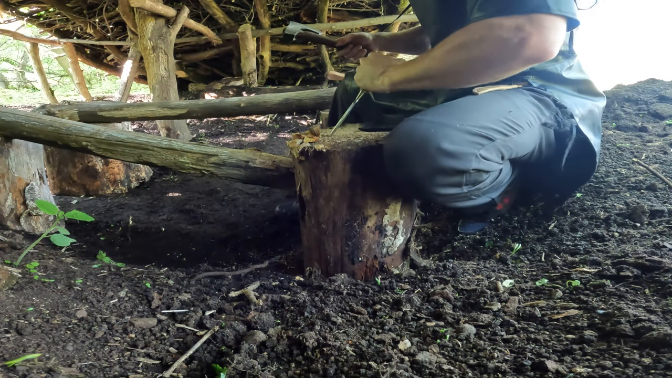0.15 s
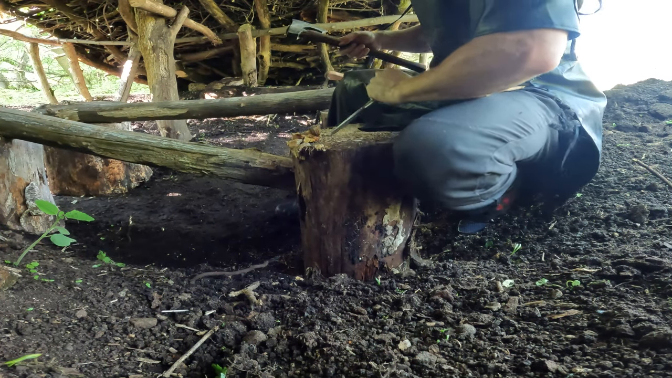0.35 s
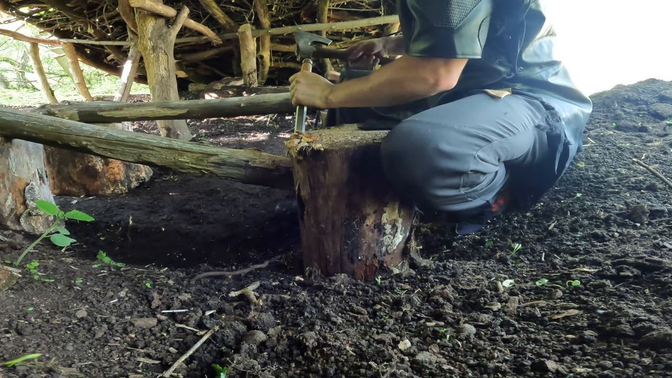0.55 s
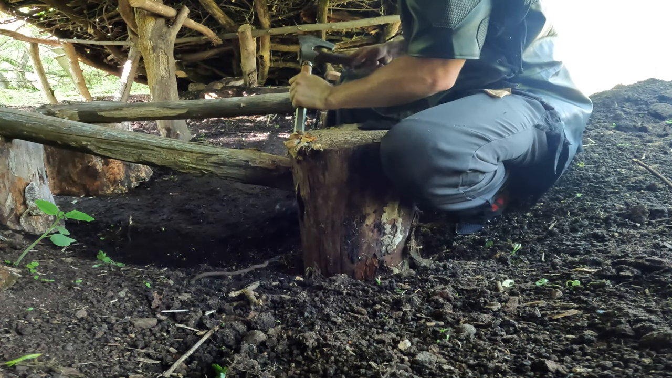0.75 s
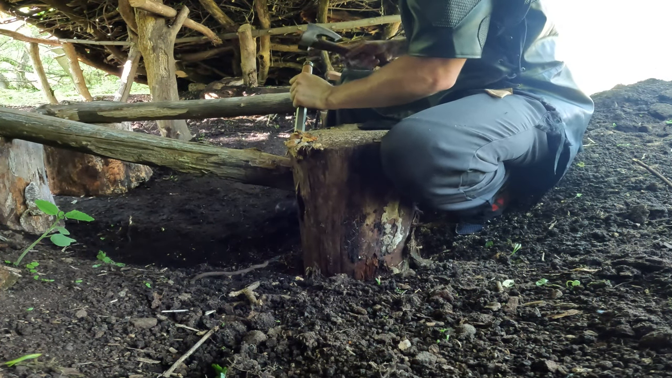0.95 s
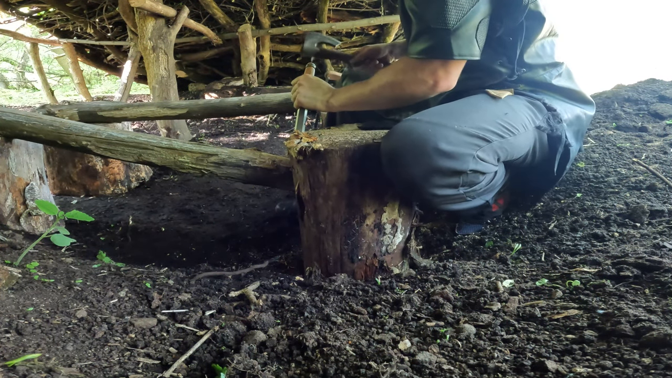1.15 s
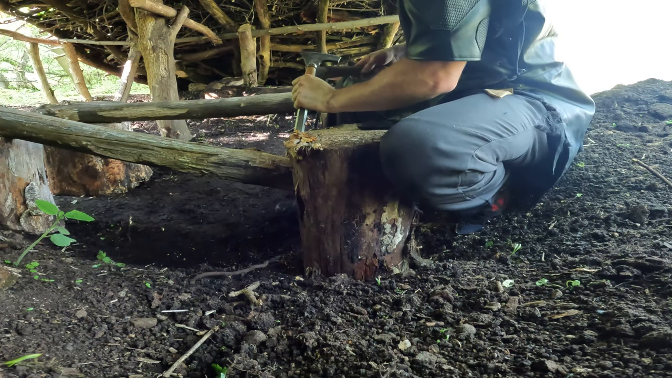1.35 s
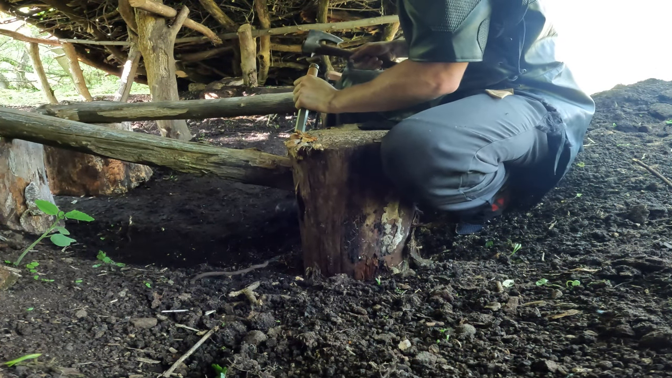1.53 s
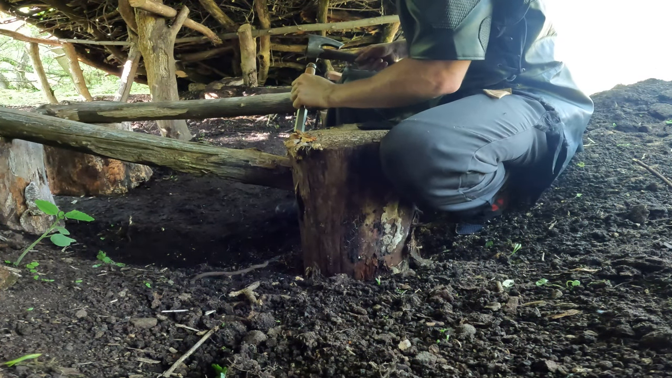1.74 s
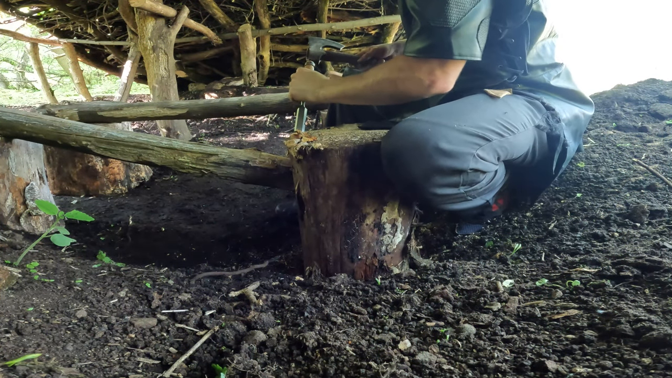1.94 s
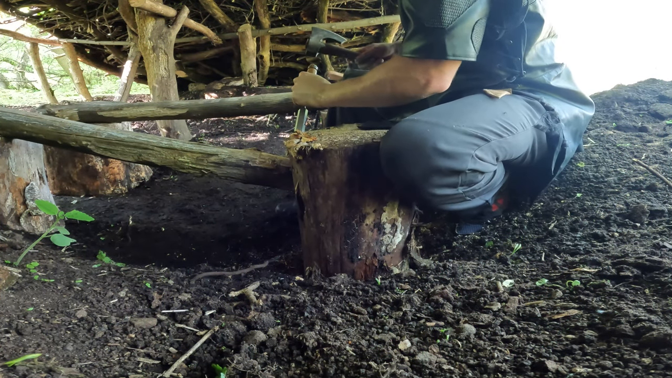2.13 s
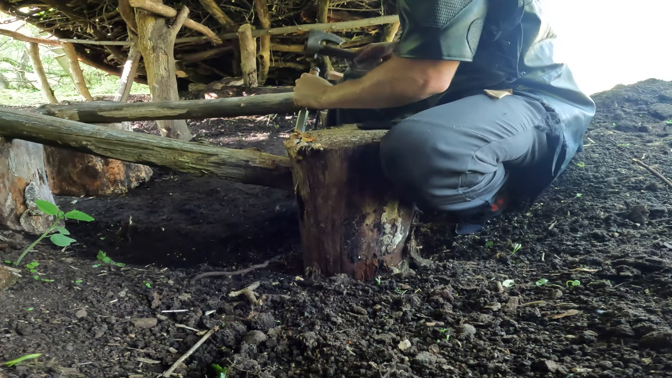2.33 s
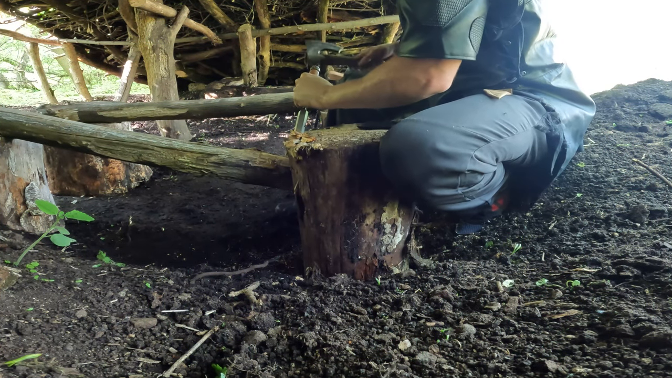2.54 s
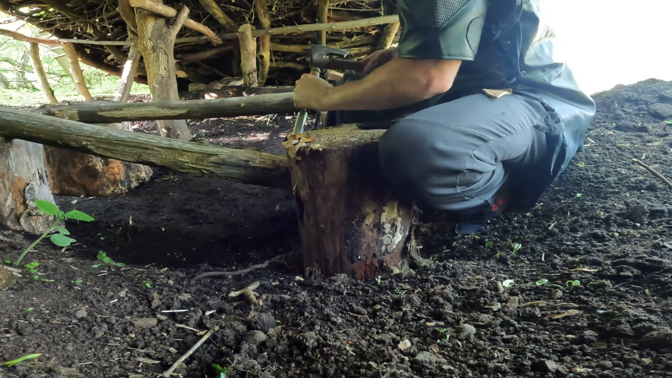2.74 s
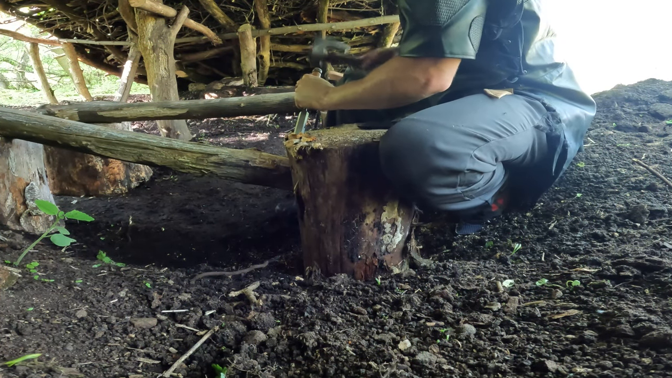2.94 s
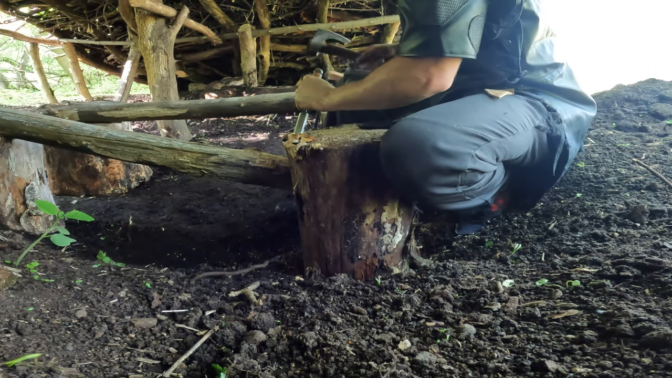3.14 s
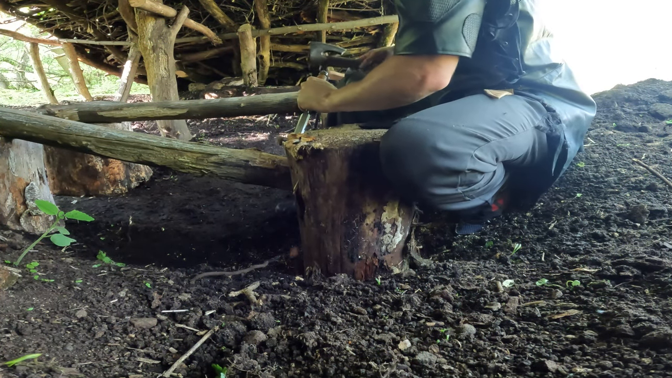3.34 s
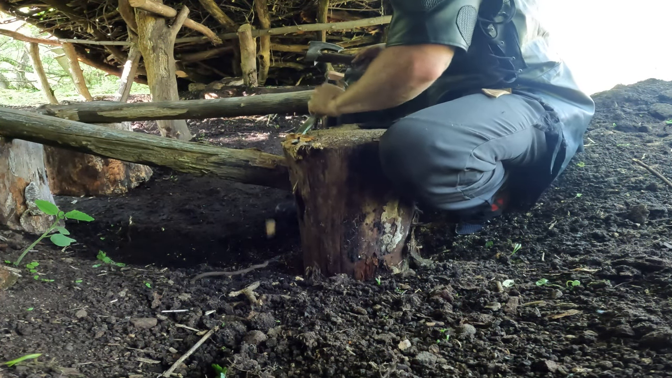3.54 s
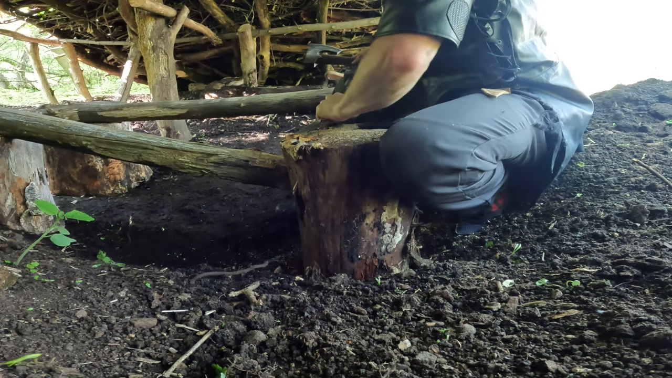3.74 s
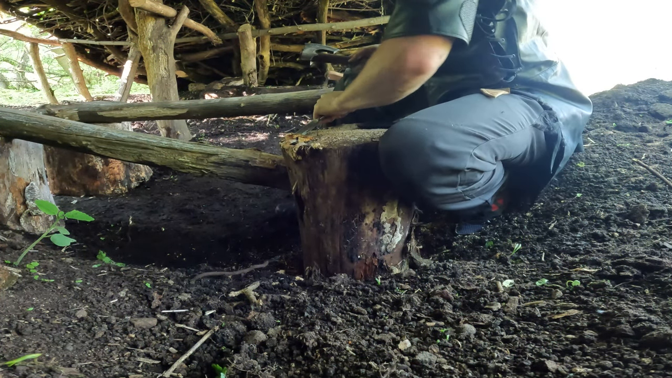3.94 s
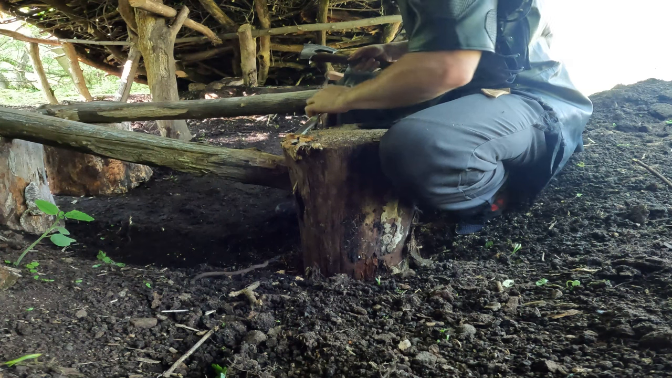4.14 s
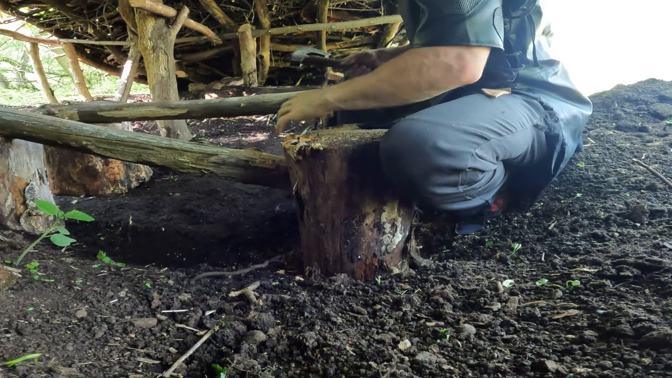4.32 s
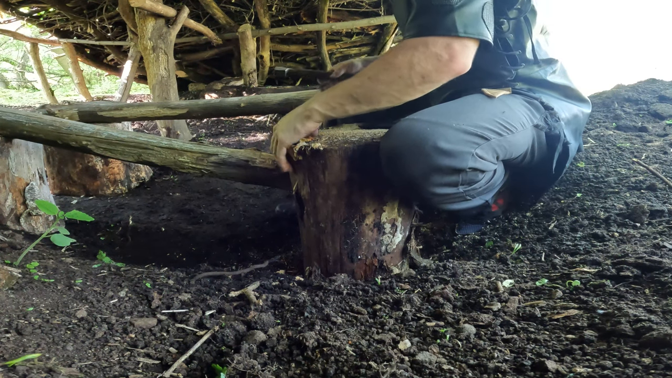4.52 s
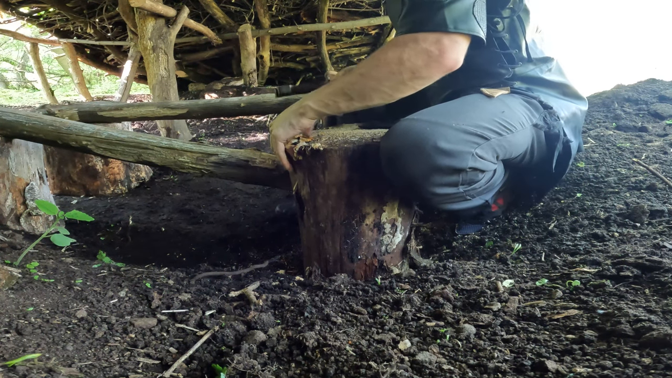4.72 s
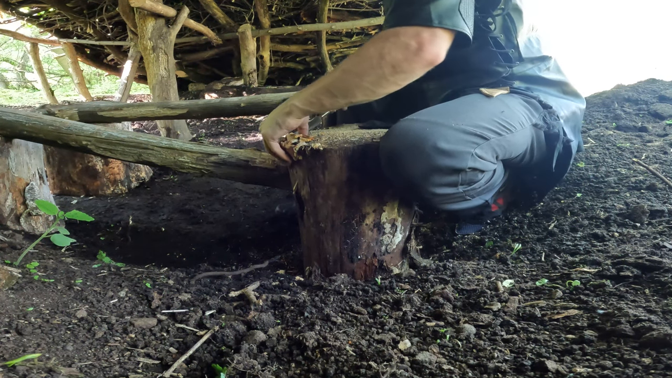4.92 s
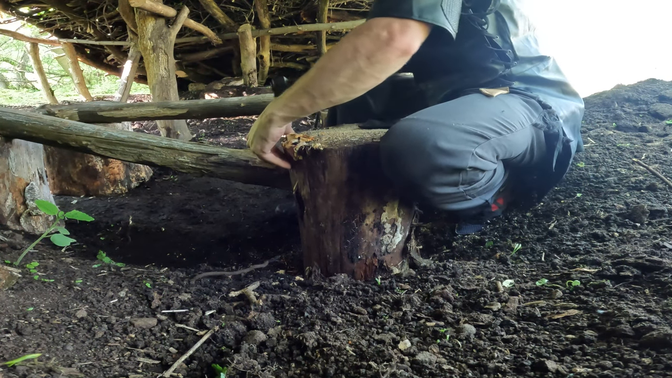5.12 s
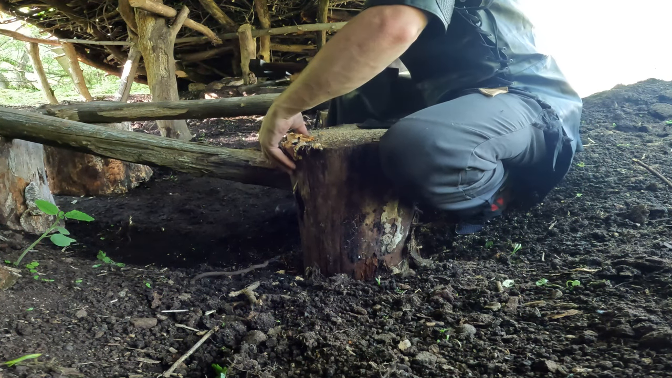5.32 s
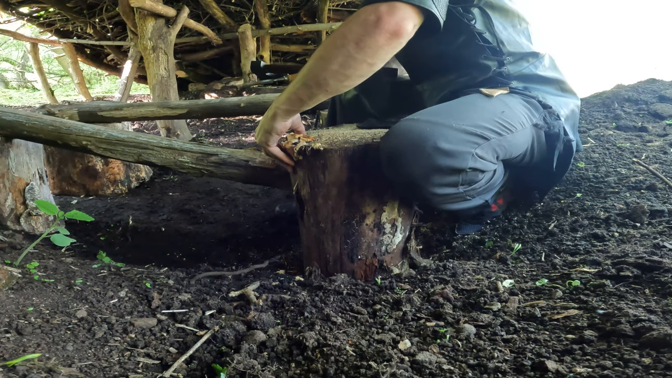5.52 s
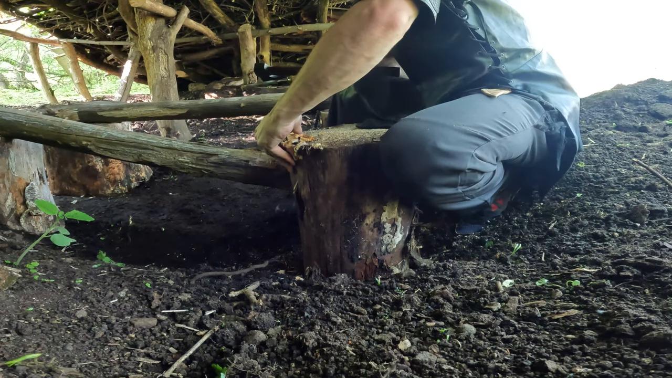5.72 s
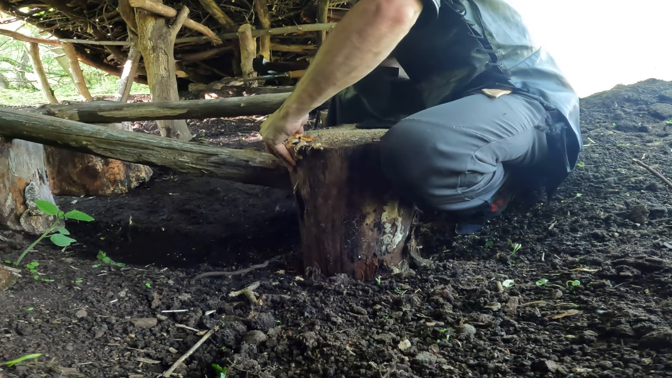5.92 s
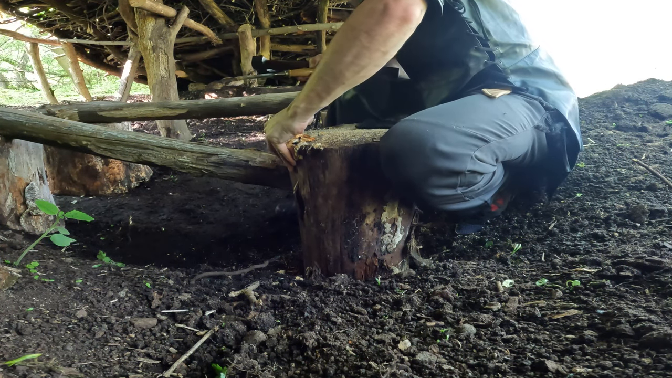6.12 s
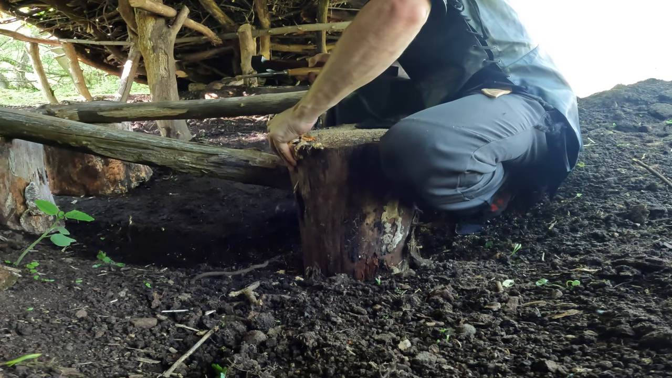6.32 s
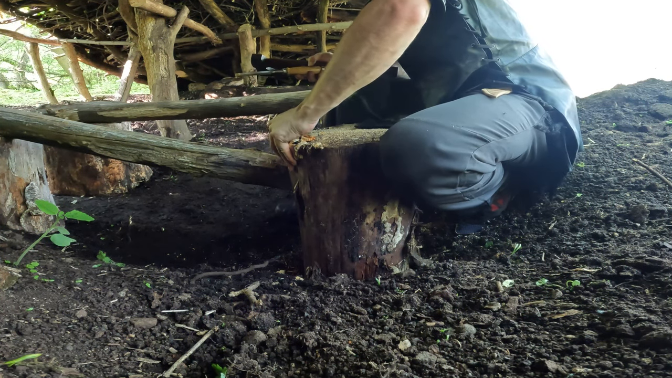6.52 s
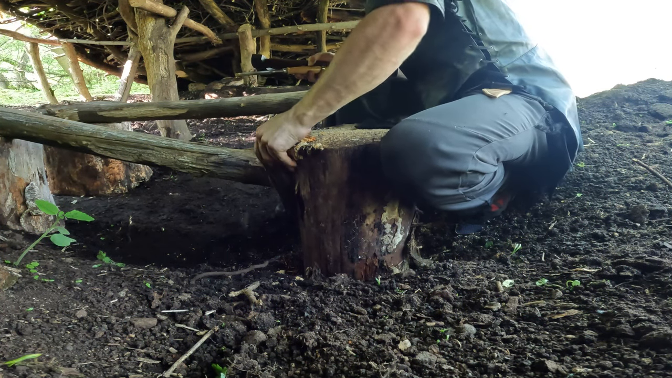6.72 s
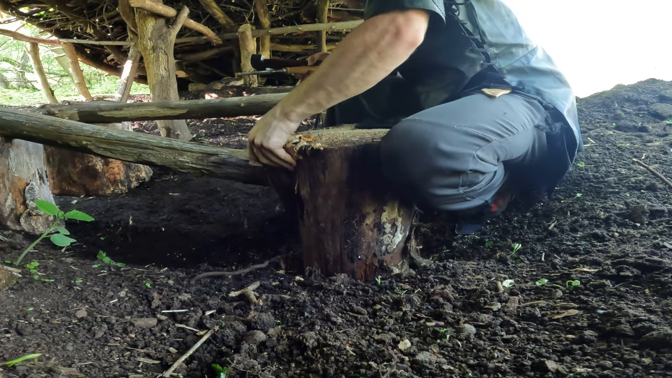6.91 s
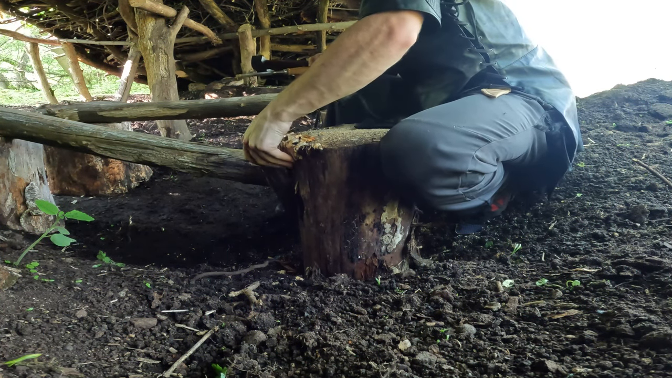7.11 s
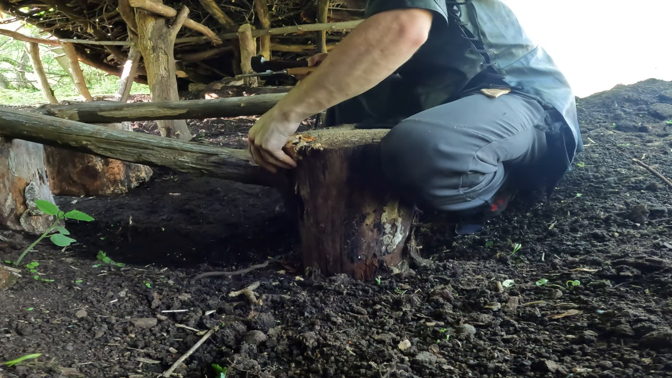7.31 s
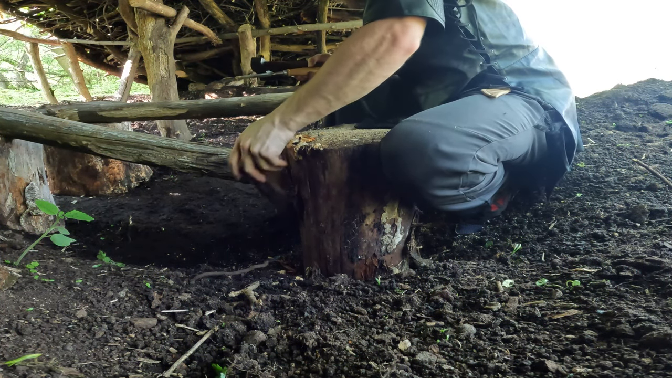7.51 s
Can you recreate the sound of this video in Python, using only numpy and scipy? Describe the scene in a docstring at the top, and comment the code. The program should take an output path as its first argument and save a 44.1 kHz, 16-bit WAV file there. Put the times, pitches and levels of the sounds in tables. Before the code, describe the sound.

Outdoors, two bursts of hard cracking strikes on wood, splinters snapping, a piece falling, hand rustling, then a final tearing crunch amid faint birds.

```python
"""Under trees, leaves hiss, traffic rumbles far off and birds call; bark snaps and soft bumps come first. A
hatchet then strikes a steel wedge in a stump's rim ten times and the split piece drops: wood and crack are
fading sine waves with a scatter of noise, splinters are short noise bursts. An engine hum, a stack of sines,
swells while a hand rubs and tears bark and splinters away, heard as grainy noise. A bird whistle falls at the
end. The microphone sits on the ground, so each blow also thuds through the soil."""
import sys
import numpy as np
from scipy import signal
from scipy.fft import rfft, irfft
from scipy.io import wavfile
from scipy.ndimage import uniform_filter1d

SR = 44100
rng = np.random.default_rng(int(sys.argv[2]) if len(sys.argv) > 2 else 0)


def transcribe(u):
    """Save the signal u as a 16-bit wav file named by the first command-line argument.

    u: samples, shape (n,) or (channels, n), limited to [-1, 1]; the rate is SR.
    q: integer samples, one column per channel.
    """
    v = np.clip(np.atleast_2d(u).T, -1, 1)
    q = np.round(v * 32767).astype(np.int16)
    wavfile.write(sys.argv[1], SR, q)


N = 333396


def gain_of(db):
    """Turns decibels into a plain multiplier."""
    return 10 ** (np.asarray(db) / 20)


def evened(x):
    """Scales x so that its average power is one."""
    return x / np.sqrt(np.mean(x ** 2) + 1e-20)


def read(points, hz):
    """Reads a curve of (pitch_hz, value) points at any pitch, evenly along a log scale of pitch."""
    f, value = np.transpose(points)
    return np.interp(np.log(hz + 1), np.log(f + 1), value)


def add(mix, start_s, sound):
    """Lays a sound into the mix at its start time, cut off where the mix ends."""
    part = mix[:, round(start_s * SR):][:, :sound.shape[-1]]
    part += sound[..., :part.shape[1]]


def coloured(x, points):
    """Filters x by a spectrum in dB, keeping the power of white input at one."""
    gain = gain_of(read(points, np.fft.rfftfreq(x.shape[-1], 1 / SR)))
    return irfft(rfft(x) * evened(gain), x.shape[-1])


def heard(mono, wide, pan_db):
    """A near sound at the two ports: a left-right tilt, and a diffuse part that differs between them."""
    # how much louder the left port is: (pitch_hz [Hz], left_over_right_db [dB])
    near_balance = [(100, -1.7), (400, -3.1), (3000, -3.3), (5000, -1.7), (9000, 0), (14000, -0.5)]
    tilt_db = read(near_balance, np.fft.rfftfreq(len(mono), 1 / SR)) + pan_db
    side = gain_of(tilt_db / 2)
    return irfft(rfft(mono + wide) * np.array([side, 1 / side]), len(mono))


def field(points, rows, split_hz, patchy_db, flicker, size):
    """Noise from all around: parts below and above split_hz follow their own levels; flicker is (Hz, dB)."""
    # how alike left and right are: (pitch_hz [Hz], likeness [1 = the same])
    likeness = [(40, .997), (130, .995), (290, .86), (640, .62), (1410, .7), (3100, .6), (6820, .74),
                (15000, .45)]
    hop = size // 4
    frames, hz = N // hop + 5, np.fft.rfftfreq(size, 1 / SR)
    a, b, c, d, patches = rng.standard_normal((frames, len(hz), 5)).T
    # patches change slowly over pitch and time, gusts move all pitches together
    patches = uniform_filter1d(patches, size=12, axis=0)
    patches = evened(uniform_filter1d(patches, size=10, axis=1))
    gusts = evened(uniform_filter1d(rng.standard_normal(frames), size=3))
    same = np.clip(read(likeness, hz), -1, 1)[:, None]
    left = a + 1j * b
    right = same * left + np.sqrt(1 - same ** 2) * (c + 1j * d)
    level_db = read(points, hz)[:, None] + patchy_db * patches + read(flicker, hz)[:, None] * gusts
    z = np.array([left, right]) * gain_of(level_db)
    upper = 1 / (1 + (split_hz / (hz[:, None] + 1)) ** 8)
    low, high = [evened(signal.istft(z * share, nperseg=size, noverlap=size - hop)[1][:, :N])
                 for share in (1 - upper, upper)]
    s, low_db, high_db = np.transpose(rows)
    t = np.arange(N) / SR
    return low * gain_of(np.interp(t, s, low_db)) + high * gain_of(np.interp(t, s, high_db))


def leaves():
    """Leaves and cloth hiss: two-channel noise with a treble that comes and goes on its own."""
    # hiss over time: (time_s [s], low_db [dB], treble_db [dB])
    hiss = [(0.0, -61, -81), (.5, -60.5, -77), (0.649, -60, -100), (1.051, -62, -82), (1.45, -59.5, -80.5),
            (1.6, -65, -87), (2.039, -65.5, -86.5), (2.351, -61, -83.5), (3.401, -61, -78.5),
            (3.72, -57, -85), (3.98, -63.5, -89), (4.25, -64, -94), (4.55, -61.5, -85), (4.9, -62.5, -91),
            (5.35, -59.5, -73), (5.55, -63, -96.5), (6.75, -61, -83.5), (7.56, -63, -94)]
    # its spectrum: (pitch_hz [Hz], level_db [dB])
    hiss_colour = [(150, -28), (250, 0.5), (325, -6.5), (640, -18), (845, -18.5), (1100, -10.5),
                   (2910, -19), (4120, -23), (6590, -24), (10400, -47.5), (11900, -39.5), (13200, -63.5),
                   (16000, -64)]
    flicker = [(1000, 0.62), (6000, 0.74), (12000, 3.3)]
    return field(hiss_colour, hiss, 8000, patchy_db=-0.5, flicker=flicker, size=512)


def traffic():
    """Distant traffic rumbles: deep noise with a quieter upper part."""
    # rumble over time: (time_s [s], low_db [dB], upper_db [dB])
    rumble = [(0.0, -38.5, -52), (.4, -40, -56.5), (1.0, -41.5, -56.5), (1.74, -46.5, -55.5),
              (2.5, -41, -57.5), (3.0, -43, -63.5), (3.4, -40, -57.5), (4.04, -49.5, -56),
              (4.8, -46.5, -56), (5.4, -41, -53.5), (6.1, -41, -56), (6.4, -51, -61.5), (6.8, -41, -56.5),
              (7.1, -50, -54.5), (7.56, -39, -55.5)]
    # its spectrum: (pitch_hz [Hz], level_db [dB])
    rumble_colour = [(7.1, -46.5), (12, -12.5), (38, 1), (59, 1.5), (91, -7), (119, -7.5), (240, -22.5),
                     (265, -29.5), (309, -27), (700, -48.5), (910, -75.5), (1540, -120)]
    return field(rumble_colour, rumble, 130, patchy_db=1.17, flicker=[(50, .6), (400, .6)], size=4096)


def tone(rows, waver):
    """A sine on a pitch curve of (time_s, pitch_hz, level_db), its height wavering at random."""
    s, hz, db = np.transpose(rows)
    t = np.arange(s[0], s[-1], 1 / SR)
    drift = uniform_filter1d(rng.standard_normal(len(t)), size=len(t) // 25 + 120)
    wobble = 1 + waver * evened(drift)
    turns = np.cumsum(np.interp(t, s, hz)) / SR + rng.random()
    level = np.sqrt(2) * gain_of(np.interp(t, s, db)) * signal.windows.tukey(len(t), .12)
    return s[0], level * wobble * np.sin(2 * np.pi * turns)


def engine(mix):
    """An engine hums: sines at whole multiples of one base pitch swell and fade, each to its own degree."""
    # how near the engine sounds: (time_s [s], near_db [dB, lower is fainter])
    nearness = [(4.1, -19.5), (4.43, -12), (4.7, -16.5), (5.22, -8), (6.08, -1), (6.5, -9.5), (6.8, -12),
                (7.25, -8), (7.4, -18.5)]
    # which multiples of the base pitch sound: (multiple)
    multiples = [2, 3, 4, 5, 7]
    # one row a multiple: (level_db [dB], share of the swell followed [0-1], waver [fraction of height])
    multiple_sound = [(-43, 0.57, 0.47), (-44.5, 0.72, 0.056), (-54, 0.55, 0.22), (-39, 0.96, 0.059),
                      (-60.5, 0.78, 0.33)]
    base_hz = 23.2
    for multiple, (level_db, share, waver) in zip(multiples, multiple_sound):
        rows = [(s, multiple * base_hz, level_db + share * near_db) for s, near_db in nearness]
        add(mix, *tone(rows, waver))


def trill(length_s, hz, width_hz, db):
    """A fast buzz, heard from afar as fluttering noise in one band."""
    t = np.arange(0, length_s, 1 / SR)
    band = [(hz - width_hz, -30), (hz - width_hz / 2, -4), (hz, 0), (hz + width_hz / 2, -3), (hz + width_hz, -30)]
    flutter = gain_of(2 * evened(uniform_filter1d(rng.standard_normal(len(t)), size=300)))
    buzz = coloured(rng.standard_normal((2, len(t))), band) * evened(flutter)
    both = buzz + .5 * buzz[::-1]  # each side hears some of the other
    return gain_of(db) * both * signal.windows.tukey(len(t), .1)


def trills(mix):
    """Birds trill with a buzz: short bands of noise."""
    # (start_s [s], end_s [s], pitch_hz [Hz], width_hz [Hz], level_db [dB])
    trill_rows = [(0.5, 0.633, 4640, 984, -64), (0.768, 1.444, 5270, 1300, -67.5),
                  (1.306, 1.631, 6930, 500, -75.5), (1.457, 1.761, 5250, 900, -79.5)]
    for start_s, end_s, *row in trill_rows:
        add(mix, start_s, trill(end_s - start_s, *row))


def note(start_s, length_s, first_hz, middle_hz, last_hz, db):
    """A whistle whose pitch bends through three frequencies and trembles a little."""
    u = np.linspace(0, 1, 5 + round(length_s * 90))  # progress through the note
    hz = np.polyval(np.polyfit([0, .5, 1], [first_hz, middle_hz, last_hz], 2), u)
    hz *= 1 + .007 * rng.standard_normal(len(u))
    # loudest a fifth of the way in, softer at both ends
    shape_db = np.interp(u, [0, 0.2, 1], [-2, 0, -8.5])
    return np.c_[start_s + u * length_s, hz, db + shape_db]


def warble(count):
    """A pitch that swings up and down once a note, its top climbing."""
    start_s, step_s = 6.112, .108
    low_hz, top_hz, climb_hz = 5850, 6570, 165  # the climb is per note
    db, gap_db = -77, -30.5  # sung on the way down, almost silent on the way up
    u = np.linspace(0, count - .5, 80)  # notes since the start
    swing = (1 + np.tanh(2.5 * np.cos(2 * np.pi * (u - .3))) / np.tanh(2.5)) / 2
    hz = low_hz + (top_hz + climb_hz * u - low_hz) * swing
    rising = np.maximum(np.cos(2 * np.pi * (u + .05)), 0) ** 2
    return np.c_[start_s + u * step_s, hz, db + gap_db * rising]


def woods(birds):
    """Trunks scatter far song: it gains a short smear of echoes, different at each port."""
    echo_db, echo_t60_s = 0, .15  # all echoes against the direct song; time to fade by 60 dB
    t = np.arange(SR // 5) / SR
    echoes = rng.standard_normal((2, len(t))) * gain_of(-60 * t / echo_t60_s)
    echoes *= gain_of(echo_db) / np.linalg.norm(echoes[0])
    return birds + signal.oaconvolve(birds, echoes, axes=1)[:, :N]


def birdsong():
    """Birds whistle far off: bending sine notes, long falls and a warble, smeared by echoes."""
    # (start_s [s], length_s [s], first_hz [Hz], middle_hz [Hz], last_hz [Hz], loudest level_db [dB])
    notes = [(.17, 0.12, 5990, 6440, 6260, -70.5), (.52, .07, 6400, 6200, 6230, -78),
             (.585, 0.043, 7400, 6800, 6100, -74), (.668, 0.022, 4680, 5250, 5750, -63),
             (.81, 0.035, 5150, 6130, 6500, -68.5), (1.71, .25, 6540, 6430, 6500, -68.5),
             (1.88, .29, 3170, 3130, 3075, -73.5), (2.02, 0.094, 7650, 7625, 7600, -85.5),
             (2.1, 0.14, 5700, 5710, 5800, -69.5), (2.229, 0.13, 6040, 6600, 6630, -73.5),
             (3.995, 0.013, 4260, 3850, 3450, -68.5), (4.04, 0.047, 2840, 3100, 3300, -72.5),
             (4.115, .025, 4300, 3750, 3280, -71), (4.155, 0.05, 2720, 3200, 3360, -69),
             (4.28, 0.032, 3320, 3300, 2900, -66.5), (4.324, 0.022, 2840, 2800, 2830, -70.5),
             (4.4, 0.017, 3300, 3040, 2800, -75), (4.558, 0.014, 3610, 3550, 3500, -62.5),
             (5.18, 0.047, 3520, 3550, 3520, -71), (5.93, 0.032, 5000, 4800, 4700, -74.5),
             (6.22, .26, 3285, 3370, 3379, -84)]
    # two long falling whistles, each a list of (time_s [s], pitch_hz [Hz], level_db [dB])
    falls = [
        [(.525, 3790, -62), (.545, 3220, -59), (.57, 2850, -63), (.61, 2510, -65), (.67, 2110, -62),
         (.72, 1845, -64), (.78, 1570, -70)],
        [(7.364, 3500, -64.5), (7.39, 3390, -65), (7.42, 3105, -64), (7.47, 3070, -72), (7.505, 2670, -66),
         (7.525, 2050, -71), (7.555, 1800, -71)],
    ]
    birds = np.zeros((2, N))
    for rows in [note(*row) for row in notes] + falls + [warble(count=4)]:
        add(birds, *tone(rows, waver=0.41))
    return woods(birds)


def stroke(peak_s, db, swell_s, fade_s):
    """Level points of one grainy sound: up to its peak and down again."""
    drop_db = 25  # how far it swells and fades
    return [(peak_s - swell_s, db - drop_db), (peak_s, db), (peak_s + fade_s, db - drop_db)]


def grainy(rows, colour, per_s, spread_db, steady):
    """Dense clicks of uneven size, each with a short noisy tail, over steady friction."""
    s, db = np.transpose(rows)
    t = np.arange(s[0], s[-1], 1 / SR)
    sizes = gain_of(spread_db * np.minimum(rng.exponential(1, len(t)), 3))
    clicks = sizes * (rng.random(len(t)) < per_s / SR)
    tails = signal.lfilter([1], [1, -np.exp(-1 / (0.00056 * SR))], clicks)
    grains = (evened(tails) + steady) * rng.standard_normal((3, len(t)))
    grains = evened(coloured(grains, colour))
    level = gain_of(np.interp(t, s, db)) * signal.windows.tukey(len(t), .15)
    return s[0], level * heard(grains[0], gain_of(-16.0) * grains[1:], pan_db=1.7)


def hand_rustle(mix):
    """A hand strokes bark and cloth: sparse, uneven grains over steady rubbing noise."""
    # (peak_s [s], level_db [dB], swell_s [s], fade_s [s], treble_db [dB: dull rub below zero, crisp above])
    rustle = [(4.21, -69, 0.029, 0.46, -0.5), (4.455, -60, .14, .3, -7.5), (4.565, -65.5, .025, .12, 4),
              (4.646, -60, .09, .06, -1), (4.798, -63, .018, .045, 5.5), (4.89, -62, 0.087, 0.091, 2),
              (5.003, -61, .025, 0.029, 3), (5.155, -65, 0.027, 0.038, 8), (5.22, -63.5, .25, .35, -1),
              (5.389, -57.5, 0.095, .03, 7), (5.498, -66.5, .15, 0.12, 2), (7.34, -71, 0.028, .04, 8),
              (7.422, -52, .025, 0.055, 0), (7.55, -64, 0.11, .02, 1.0)]
    # spectrum before the treble change: (pitch_hz [Hz], level_db [dB])
    rustle_colour = [(700, -13), (1500, -3.5), (3300, 2), (4500, -5), (6500, 1.5), (8500, -11.5),
                     (12000, -15.5), (14000, -35)]
    for *row, treble_db in rustle:
        colour = [(hz, db + treble_db * (hz > 4000)) for hz, db in rustle_colour]
        add(mix, *grainy(stroke(*row), colour, per_s=360, spread_db=6.5, steady=1.0))


def tears_and_clatter(mix):
    """Bark tears and the falling piece clatters: dense runs of clicks."""
    # (peak_s [s], level_db [dB], swell_s [s], fade_s [s])
    runs = [(.345, -57, .05, 0.11), (.415, -54, .15, 0.039), (3.6, -55, 0.074, .08),
            (3.735, -48, 0.057, 0.072), (3.798, -53, 0.054, 0.019), (6.72, -33.5, .022, 0.069),
            (6.784, -26.5, 0.089, 0.028), (6.81, -45, 0.022, 0.093)]
    # spectrum: (pitch_hz [Hz], level_db [dB])
    run_colour = [(71, -43), (120, -8), (436, -0.5), (630, -12), (968, -2.5), (1160, -11.5), (2380, -16),
                  (7050, -20), (11500, -34.5), (16000, -50)]
    for row in runs:
        add(mix, *grainy(stroke(*row), run_colour, per_s=900, spread_db=3, steady=.45))


def bump(db, hz, t60_s):
    """A soft push rings the wood for a few cycles."""
    t = np.arange(SR // 6) / SR
    return gain_of(db - 60 * t / t60_s) * (1 - np.exp(-t / 0.0031)) ** 2 * np.sin(2 * np.pi * hz * t)


def bumps_on_stump(mix):
    """Hand and wood bump and tap the stump softly: short fading sines."""
    # (start_s [s], level_db [dB], pitch_hz [Hz], t60_s [s to fade by 60 dB])
    bumps = [(.136, -27, 283, 0.035), (.258, -20, 285, 0.033), (3.851, -18.5, 297, 0.039),
             (4.793, -51.5, 2050, 0.057), (4.793, -57, 3620, 0.059), (4.799, -17, 324, 0.017),
             (6.054, -32, 261.6, 0.04), (6.509, -11.5, 186, 0.011), (6.625, -6.5, 218, 0.032),
             (6.77, -24, 167, 0.044)]
    for start_s, *row in bumps:
        add(mix, start_s, bump(*row))


def snap(db, low_db, treble_db):
    """A fibre breaks: a sharp tick of noise and a weaker, longer tail."""
    t = np.arange(SR // 8) / SR
    colour = [(150, low_db - 22), (500, low_db + 3), (1200, low_db + 4), (2000, -1.6), (4500, -4.0),
              (6500, treble_db - 3), (8000, treble_db - 9), (12500, treble_db - 19), (16000, treble_db - 36)]
    tick = gain_of(-60 * t / 0.0074)
    tail = gain_of(-14.0 - 60 * t / 0.062)
    shape = (tick + tail) * (1 - np.exp(-t / 0.00034)) ** 2
    noise = coloured(rng.standard_normal((3, len(t))), colour) * shape
    # give back the power that coloured() evens out, so the middle keeps its level as low and treble change
    power = np.mean(gain_of(2 * read(colour, np.linspace(0, SR / 2, 200))))
    return gain_of(db) * np.sqrt(power) * heard(noise[0], gain_of(-11.0) * noise[1:], pan_db=2.5)


def splinters(mix):
    """Splinters and bark snap: single ticks of noise, each with its own bass and treble."""
    # (start_s [s], level_db [dB], low_db [dB], treble_db [dB])
    snaps = [(.3184, -35.5, -2, -3), (.365, -29.5, -4, -2), (.396, -31, -13, 0), (.4528, -39.5, -5, 0.5),
             (.506, -45, 8.5, -14), (1.3564, -49.5, 16.5, -8), (1.4246, -11, 3, 1.5), (1.4491, -17, -8, 3),
             (1.4664, -28, 14, -18), (1.779, -46, -14, -2), (1.925, -52.5, -7, 8), (2.2507, -41, -21, -6),
             (3.1745, -23.5, -4, -7.5), (3.3169, -17, -8, -12), (3.49, -11, -3, -8.5),
             (3.5432, -40, -18, 7.5), (3.5713, -24, -8, -7), (3.5956, -35.5, -7, 3), (3.617, -44, -19, 4),
             (3.6257, -26.5, -17, 0.5), (3.6411, -29.5, -4, 1), (3.7079, -23, -7, -2),
             (3.7292, -20.5, -11, -1), (3.7493, -19, 0.5, -2.5), (3.763, -28, -9, -4),
             (3.7694, -22.5, -7, -5), (3.791, -23, -5, -7), (3.828, -15, -4.5, -3.5),
             (3.8499, -7.5, -7, -10), (3.8639, -13.5, 1.5, -7), (3.8704, -40, 15, -11),
             (3.9335, -36, -9, -12), (3.963, -35, -26.5, -3), (4.6337, -38, -6.5, -7),
             (4.8896, -50, 2.5, 9), (4.9168, -36, -26, -10), (5.3853, -42.5, -16, 10.5),
             (6.0554, -19, -5.5, -6), (6.1647, -29.5, 4.5, -33.5), (6.2193, -38.5, -13, -4),
             (6.325, -42.5, 0.5, -4), (6.4734, -33, -11, -9), (6.5086, -27, -0.5, -4.5),
             (6.575, -34.5, -6, -6), (6.6223, -20.5, -0.5, -7), (6.6427, -27.5, -21, -9),
             (6.6626, -25, -20, -14), (6.683, -24.5, -17, -11), (6.7076, -24, -2, -8),
             (6.7164, -3.5, -17, -15), (6.7229, -9, 2, -5.5), (6.7398, -7.5, -0.5, -21),
             (6.7457, -12, -2, -3), (6.7592, -7.5, -3, -9), (6.7668, -10.5, 5.5, -33),
             (6.7794, -9, -3, -33), (6.7911, -11.5, -23, -32), (6.8036, -21.5, -7, -18),
             (6.8423, -44, -18, -15), (6.8608, -32, -8.5, -7), (7.0899, -33, -2, -5.5),
             (7.424, -37.5, -9, 9.5)]
    for start_s, *row in snaps:
        add(mix, start_s, snap(*row))


def blow(lead_s, crack_db, firmness, body, knock, treble, thud_pitch, stump_pitch, stump_length):
    """A short force rings many fading sines, balanced anew for each blow; a scatter of fibres and echoes follows."""
    # pitches at which each blow's balance is set: (pitch_hz [Hz])
    band_hz = [60, 130, 230, 470, 1050, 2800, 5600]
    # ringing of stump and blade, before each blow's changes:
    # (pitch_hz [Hz], level_db [dB], t60_s [s to fade by 60 dB], rise_s [s], sign [+1 or -1])
    modes = [(46, -1.5, 0.32, 0.01149, 1), (77.6, 15.5, 0.068, 0.003, 1), (135.5, 10.5, 0.12, .0015, 1),
             (155.7, -7.5, 0.28, 0.00068, 1), (195, 2.5, .15, 0.0016, 1), (235, 1.5, 0.13, 0.0021, 1),
             (267, -7.5, 0.13, 0.00063, 1), (436.6, 2.5, .08, 0.00025, 1), (502, 3.5, 0.053, 0.00027, 1),
             (769, 6, 0.038, 0.00063, 1), (1142, 8, 0.022, 0.00077, 1), (1442, -6.5, 0.036, 0.0003, 1),
             (1840, 6, 0.0061, 0.00014, 1), (2340, -12.5, 0.0028, 0.0001, -1),
             (2850, 5.5, 0.0043, 0.00041, -1), (3160, -16, 0.011, 0.0005, -1),
             (5080, 12, 0.0027, 0.00017, -1), (6410, 2.5, 0.0048, 0.00033, 1),
             (7220, -7, 0.0091, 0.00013, -1), (9630, -25.5, 0.017, 0.00018, 1),
             (12200, -26.5, 0.009, 0.000095, 1)]
    # spectrum of fibres and echoes: (pitch_hz [Hz], level_db [dB])
    scatter_colour = [(180, -38), (300, -2), (749, -15.5), (2280, -24.5), (2980, -25.5), (3830, -25.5),
                      (6740, -29), (8790, -43.5), (12700, -49), (16000, -98.5)]
    # how long they last: (pitch_hz [Hz], t60_s [s to fade by 60 dB])
    scatter_t60 = [(300, 0.096), (1000, 0.094), (3000, 0.086), (7000, 0.079), (15000, 0.095)]
    wedge_hz, wedge_t60_s = 3030, .16
    stump_late_s = .0015  # the time the force takes to move the stump
    ground_db, touch_db = -31.5, -29.5  # against the crack
    t = np.arange(SR // 3) / SR

    def by_firmness(thin, dull):
        """Moves a setting from a ringing, thin blow to a dull one with more thud."""
        return thin + (dull - thin) * firmness

    thud = by_firmness(-33, -18.5)
    clack = by_firmness(-6, 8)  # dB against the knock
    wedge_db = by_firmness(-33.5, -62.5)
    crack_length = by_firmness(1, 0.56)
    weights = list(zip(band_hz, [ground_db, thud, body, knock, knock + clack, 0, treble]))

    # the wedge rattles in its slot
    grip = 1 + .8 * evened(uniform_filter1d(rng.standard_normal(len(t)), size=200))
    ring = gain_of(wedge_db - 60 * t / wedge_t60_s) * grip * np.sin(2 * np.pi * wedge_hz * t)
    for hz, db, t60_s, rise_s, sign in modes:
        if hz > 1500:
            tune, last = 1, crack_length
        else:
            tune, last = thud_pitch if hz < 170 else stump_pitch, stump_length
        since = np.maximum(t - stump_late_s * (hz < 600), 0)
        turns = hz * tune * (1 + .012 * rng.standard_normal()) * since
        shape = (1 - np.exp(-since / rise_s)) ** 2 * gain_of(-60 * since / (t60_s * last))
        ring += sign * gain_of(db + read(weights, hz)) * shape * np.sin(2 * np.pi * turns)

    noise = coloured(rng.standard_normal((3, len(t))), scatter_colour)
    hz, frame_s, z = signal.stft(noise, SR, nperseg=128)
    z *= gain_of(-60 * frame_s / read(scatter_t60, hz)[:, None] + 0.5 * read(weights, hz)[:, None])
    scatter = signal.istft(z, SR, nperseg=128)[1][:, :len(t)] * (1 - np.exp(-t / 0.00047)) ** 2
    main = heard(ring + gain_of(-15.5) * scatter[0], gain_of(-23.0) * scatter[1:], pan_db=2.34)
    out = np.pad(main, ((0, 0), (round(lead_s * SR), 0)))
    add(out, 0, snap(touch_db, 0, -21))  # a light touch on loose fibres just before the main impact
    return gain_of(crack_db) * out


def hatchet_and_drop(mix):
    """Ten hatchet blows hit the wedge, each ringing the wood by the same formula."""
    # ten blows: (start_s [s], crack_db [dB], firmness [0 thin - 1 dull], body_db, knock_db and treble_db [dB
    # against the crack], thud pitch, stump pitch and stump length [factors])
    impacts = [(0.6258, -0.5, 0.042, -17, -25, -21, 1.2, 1.021, .62),
               (0.8897, 1.5, .25, -18.5, -31, -11.5, 1.12, .98, .84),
               (1.1573, 1.5, 0.25, -24, -31, -12.5, 0.96, 1.02, 0.82),
               (1.4208, -8, 0.012, -9, -13.5, -25, 0.73, 0.98, 0.98),
               (2.3433, 0.0, 0.66, -24, -28, -16, 1.16, 0.96, 0.95),
               (2.5982, .5, 0.66, -20.5, -29, -10, 1.01, 0.96, 0.75),
               (2.8512, 1.5, .5, -34, -31.5, -14, 1.01, .97, 0.82),
               (3.0965, 1, 0.62, -21.5, -27.5, -12.5, 0.99, 0.97, 0.7),
               (3.3462, 2, 0.81, -21.5, -28, -14.5, 1, 1.024, 0.59),
               (3.6653, -4.5, 0.93, -17, -16.5, -6.5, 1.18, 1.09, 0.48)]
    lead_s = 0.012  # a light touch comes this long before each impact
    for start_s, *row in impacts:
        add(mix, start_s - lead_s, blow(lead_s, *row))


def scene():
    """Adds up all the sounds, from the background to the blows."""
    mix = leaves() + traffic()
    engine(mix)
    trills(mix)
    mix += birdsong()
    hand_rustle(mix)
    tears_and_clatter(mix)
    bumps_on_stump(mix)
    splinters(mix)
    hatchet_and_drop(mix)
    return mix


def record(dry):
    """The input rounds off the tallest peaks; the left port hears slightly later than the right; then the band
    limit."""
    edge_hz, lag = 16200, .8  # top of the band; lag of left in samples
    rounded = dry / (1 + (dry / .95) ** 6) ** (1 / 6)
    taps = np.arange(-127, 128) - np.array([[lag / 2], [-lag / 2]])
    edge = 2 * edge_hz / SR * np.sinc(2 * edge_hz / SR * taps) * np.kaiser(255, 9)
    return signal.oaconvolve(rounded, edge, "same", axes=1)


dry = scene()
out = record(dry)
transcribe(out)
```